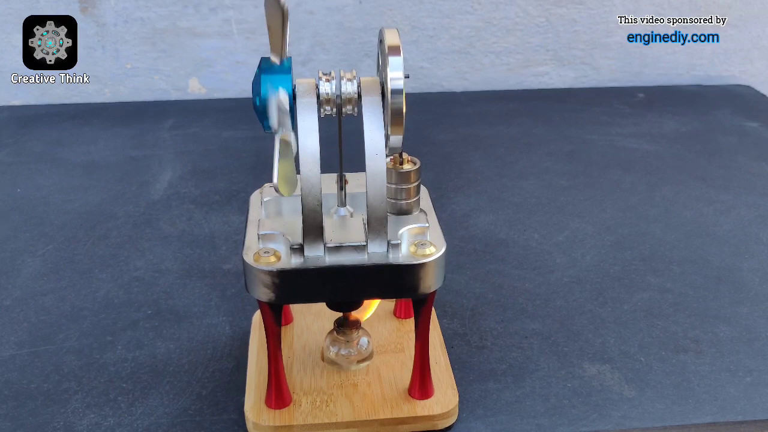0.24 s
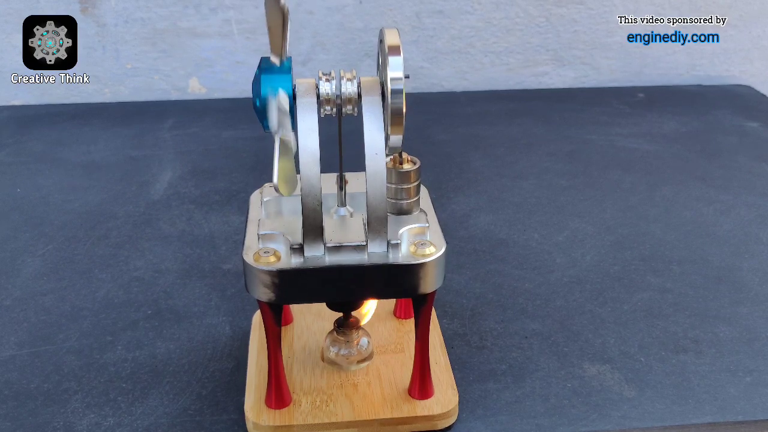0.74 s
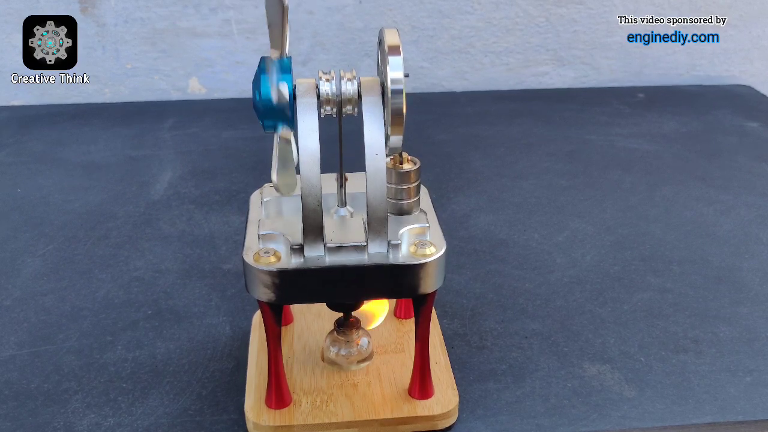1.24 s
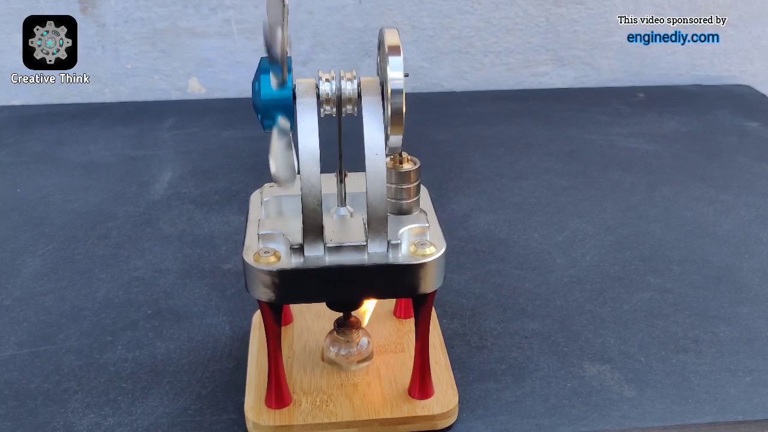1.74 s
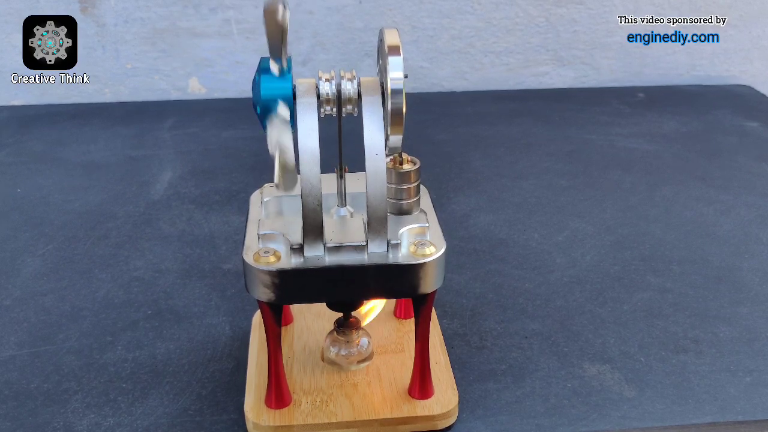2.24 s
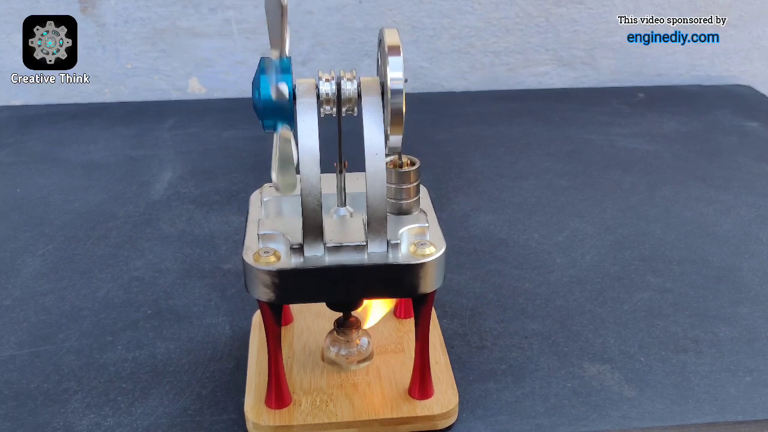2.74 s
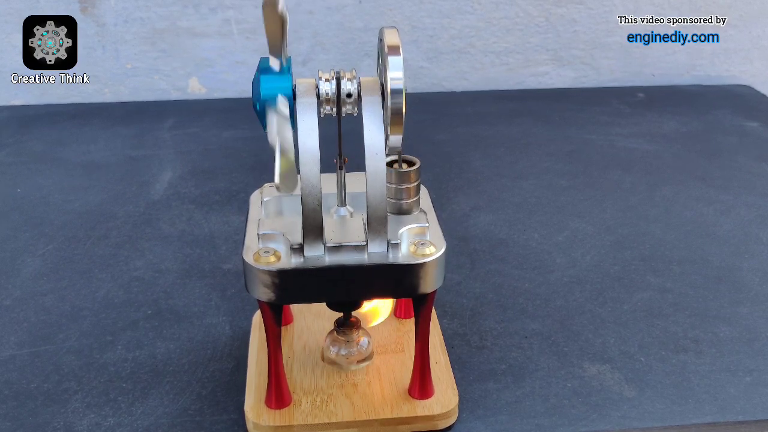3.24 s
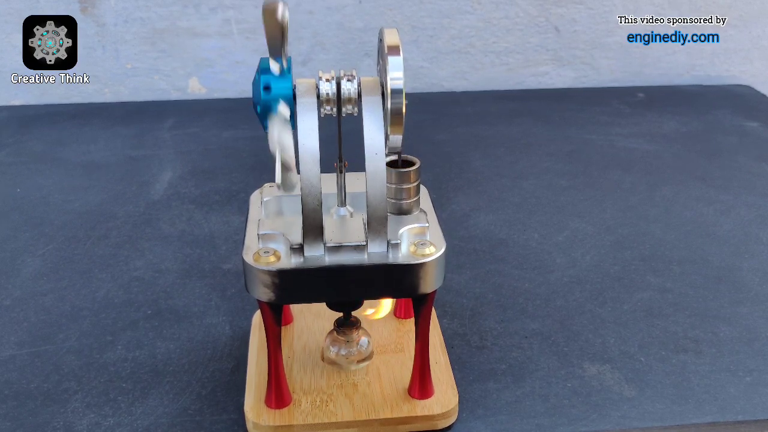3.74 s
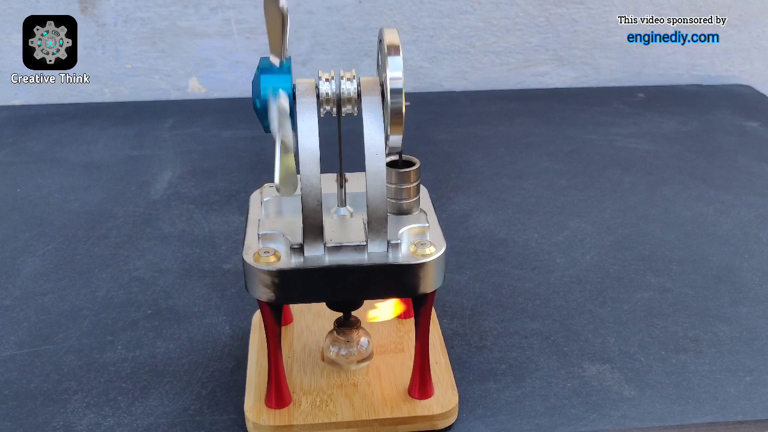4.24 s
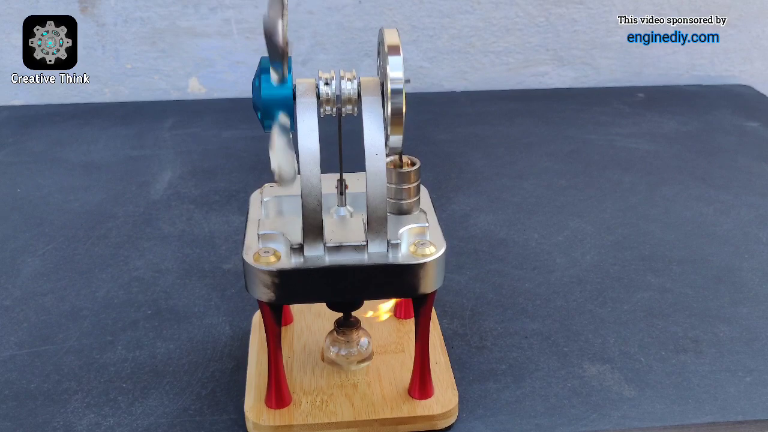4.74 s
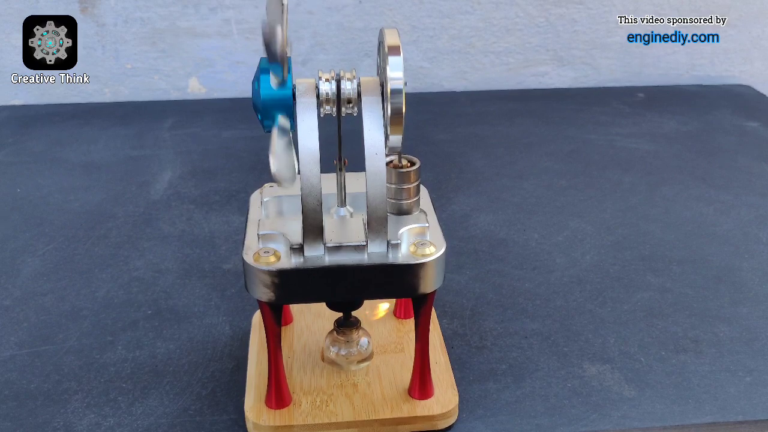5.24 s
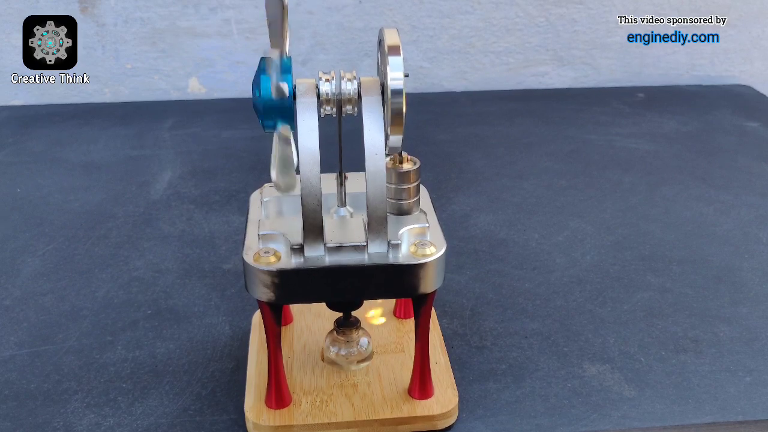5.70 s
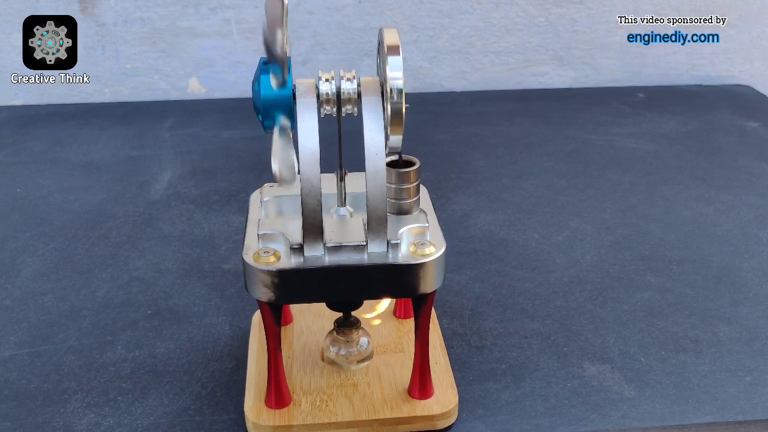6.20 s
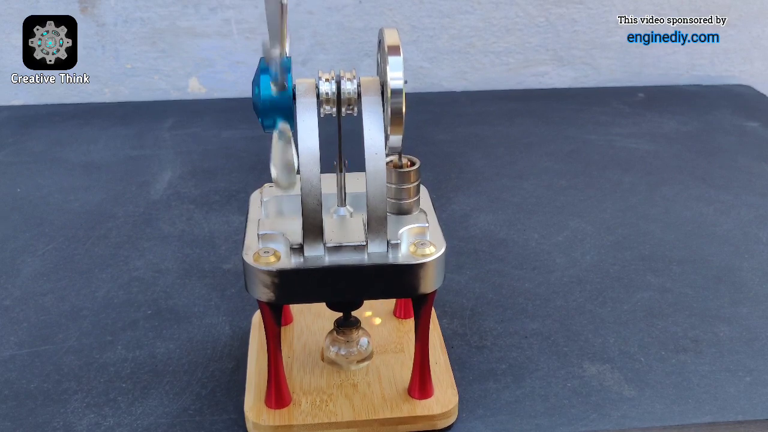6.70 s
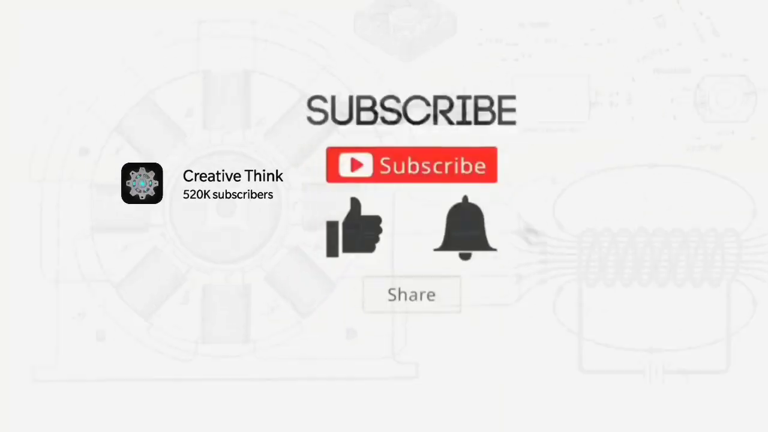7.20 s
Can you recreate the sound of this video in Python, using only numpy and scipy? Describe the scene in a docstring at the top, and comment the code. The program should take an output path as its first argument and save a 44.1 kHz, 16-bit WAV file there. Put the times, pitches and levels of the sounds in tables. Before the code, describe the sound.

From 0 s a small metal hot-air engine is already running close to a stereo phone microphone. It makes a rapid, bright, dry clatter, about twelve turns a second, each with a hard main knock and a nearly equal return knock, plus weaker rebounds and scratchy piston rubbing. The clicks are short, crisp and concentrated in the treble, varying a little in strength. Beneath are a faint hollow airy tone near 930 Hz, fading slowly, a soft low hum and quiet hiss. The pace eases slightly, more noticeably after 4 s, to about eleven turns a second. Wind is barely present at first; small low puffs come from about 3.4 s, mostly left, growing into fluttering thumps from 5.4 s and strongest from 6 to 6.9 s. At about 6.92 s everything cuts off instantly, without a tail, and silence remains until the end.

```python
"""A small metal hot-air engine runs on a table, slowing as it goes: five knocks a turn ring its frame.
Blows and the rubbing piston excite damped modes; the cylinder is noise through a narrow resonance.
The base hums in harmonics of the turning rate. Shaped noise makes the hiss and the wind on the ports
of a two-port phone microphone, which rises towards the end; then all is cut off."""
import sys
import numpy as np
from scipy import signal
from scipy.fft import rfft, irfft, next_fast_len
from scipy.io import wavfile
from scipy.ndimage import uniform_filter1d

SR = 44100
rng = np.random.default_rng(int(sys.argv[2]) if len(sys.argv) > 2 else 0)


def invert_db(level):
    """Linear amplitude ratio for a level in decibels (20 dB per decade), elementwise."""
    return 10 ** (np.asarray(level, dtype=float) / 20)


def transcribe(signal):
    """Save signal, clipped to [-1, 1], as a 16-bit WAV file at the path in sys.argv[1]."""
    frames = np.atleast_2d(signal).T
    limited = np.clip(frames, -1, 1)
    pcm = np.round(limited * 32767).astype(np.int16)
    wavfile.write(sys.argv[1], SR, pcm)


N = 328972


def shape(x, points):
    """Linear filtering: a zero-phase gain through (f/Hz, gain/dB) points on a log frequency axis."""
    hz, db = np.transpose(points)
    size = next_fast_len(N)
    log_hz = np.log(np.arange(size // 2 + 1) * SR / size + 1)
    gain = invert_db(np.interp(log_hz, np.log(hz), db))
    return irfft(rfft(x, size) * gain, size)[..., :N]


def colour(x, points):
    """Spectral shaping with normalised power: the filtered signal has rms 1."""
    y = shape(x, points)
    return y / np.sqrt(np.mean(y ** 2))


def walk(rate):
    """Random modulation: normal values held for 1 / rate s, then smoothed twice; spread near 1."""
    k = int(SR / rate)
    held = np.repeat(rng.standard_normal(N // k + 1), k)
    return 0.81 * uniform_filter1d(uniform_filter1d(held, k), k)[:N]


def ring(x, hz, t60):
    """Damped resonance: one complex pole; a unit impulse rings with size 1."""
    pole = np.exp(2j * np.pi * hz / SR - np.log(1000) / (t60 * SR))
    return signal.lfilter([1], [1, -pole], x).imag


# colour of the quiet air and microphone hiss: f/Hz, relative level left/dB, right/dB
AIR = [(29.85, -36.5, -32.5), (124.5, 1, -1), (303, -12.5, -8.5), (667, -11, -20), (1510, -17, -18),
       (3200, -16.5, -34.5), (6400, -9.5, -9), (8600, -49.5, -32.5), (11200, -43, -30), (12500, -44, -32),
       (14120, -30, -34), (15300, -43, -33)]
# thin wavering tones: f/Hz, relative level/dB
WHINE = [(13744, -75), (14077, -83), (14153, -69)]


def air():
    """Partly coherent noise: hiss most alike at both ports in the bass, with tones that come and go."""
    hiss_db = -45  # rms
    mid, side = rng.standard_normal((2, N))
    side = side - .7 * uniform_filter1d(side, size=12)  # less difference in the bass
    table = np.array(AIR)
    left = shape(mid + side, table[:, [0, 1]])
    right = shape(mid - side, table[:, [0, 2]])
    hiss = np.array([left, right])
    t = np.arange(N) / SR
    wobble_rad = 3.0
    tones = np.zeros(N)
    for hz, db in WHINE:
        tones += invert_db(db + 4.0 * walk(7)) * np.sin(2 * np.pi * hz * t + wobble_rad * walk(25))
    return hiss / hiss.std() * invert_db(hiss_db) + tones * invert_db(np.array([[-4.0], [3.5]]))


# steady wind: t/s, relative level/dB
WIND = [(0, -54), (1.3, -55), (2.2, -51), (3.1, -47), (3.5, -40.5), (4.5, -44.5), (5.3, -40), (5.9, -34.5),
        (6.1, -38.5), (6.4, -32), (6.92, -30)]
# colour of the wind: f/Hz, relative level/dB
WIND_COLOUR = [(12, -7), (30, -2.5), (60, -7), (110, -20), (200, -26), (400, -47), (800, -75.5)]
# gusts, mostly on the left port: t/s, relative peak level/dB, length between 1/e points of power/s
GUSTS = [(1.412, -49, .04), (2.324, -50, .06), (3.399, -38.5, .06), (3.771, -36, 0.099),
         (3.893, -31, 0.025), (4.166, -39.5, .08), (4.245, -35, .04), (4.332, -33, 0.037),
         (4.655, -36.5, 0.084), (4.832, -40, 0.059), (4.938, -30.5, 0.033), (5.447, -27, 0.053),
         (5.55, -31, 0.063), (5.648, -25, 0.045), (5.743, -30.5, 0.041), (5.806, -27.5, 0.022),
         (5.954, -28.5, 0.039), (6.022, -17, 0.023), (6.125, -22, 0.11), (6.225, -26, 0.054),
         (6.312, -21, 0.043), (6.48, -33, 0.025), (6.662, -26, 0.059), (6.764, -20.5, 0.024),
         (6.838, -22.5, 0.029)]
# sharp buffets, strongest on the left port and peaking 4 ms after t: t/s, relative peak level/dB
BUFFETS = [(5.436, -36), (5.639, -42.5), (5.988, -30.5), (6.019, -28.5), (6.072, -26.5), (6.109, -33),
           (6.168, -37), (6.209, -32.5), (6.31, -29), (6.631, -22), (6.759, -31.5), (6.829, -34.5),
           (6.897, -29)]
# colour of the buffets: f/Hz, relative level/dB
BUFFET_COLOUR = [(40, -9), (120, 9), (250, -5), (500, -18), (900, -47.5)]


def port_power(left_minus_right_db):
    """Power division: shares at left and right that always add up to 4."""
    return 4 / (1 + invert_db(2 * left_minus_right_db * np.array([[-1], [1]])))


def wind():
    """Turbulent pressure noise: separate eddies at each port, swelling in gusts, and shared buffets."""
    steady_pan_db, gust_pan_db = 3.5, 17.5  # left minus right
    t = np.arange(N) / SR
    # amp of twice the dB is a power
    steady = invert_db(2 * np.interp(t, *np.transpose(WIND)))
    gusts = sum(invert_db(2 * db) * np.exp(-((t - at) / length * 2) ** 2) for at, db, length in GUSTS)
    size = np.sqrt(steady * port_power(steady_pan_db) + gusts * port_power(gust_pan_db))
    eddies = rng.standard_normal((2, N)) * invert_db(3.8 * np.array([walk(40), walk(40)]))
    gate = sum(invert_db(db) * np.exp(-((t - at - .004) / 0.008) ** 2) for at, db in BUFFETS)
    buffets = gate * colour(rng.standard_normal(N), BUFFET_COLOUR)
    return colour(eddies, WIND_COLOUR) * size + buffets * invert_db(np.array([[3.0], [-14.0]]))


# the slowing crank, every fifth main knock: t/s, how hard the joints knock/dB
CRANK = [(0.0111, 0), (.426, -1), (0.8416, 0), (1.2606, 0.5), (1.6805, 0.5), (2.1006, 0.5), (2.521, 1),
         (2.9435, -0.5), (3.3676, 0.5), (3.7946, -1), (4.2243, 0), (4.658, 0), (5.0952, -0.5), (5.5377, 0),
         (5.9878, -1), (6.448, -2.5), (6.9152, -2)]


def turns():
    """Kinematics: time of each turn's main knock, and how hard that turn runs in dB."""
    turns_a_row = 5
    s, db = np.transpose(CRANK)
    row = np.arange((len(s) - 1) * turns_a_row + 1) / turns_a_row
    return np.interp(row, np.arange(len(s)), s), np.interp(row, np.arange(len(s)), db)


def crank():
    """Rotational phase: share of a turn since the last main knock, at every sample."""
    s = turns()[0]
    # one turn more at each end, then a far point
    s = np.r_[2 * s[0] - s[1], s, 2 * s[-1] - s[-2], 9]
    return np.interp(np.arange(N) / SR, s, np.arange(len(s))) % 1


# base humming on the table: multiple of the turning rate, relative level at the start/dB, once slowed/dB
HUM = [(7, -58, -58), (9, -60, -66), (13, -56, -61), (14, -54, -68), (15, -51, -46), (16, -56, -55),
       (17, -53, -59), (18, -61, -50), (21, -66, -64)]


def base(turn):
    """Forced vibration: the unbalanced crank shakes the base at harmonics whose balance shifts."""
    hum_db, waver_db, slowed_s = -0.8, 2.2, 6.1
    slowed = np.clip(np.arange(N) / SR / slowed_s, 0, 1)
    hum = np.zeros(N)
    for k, fast_db, slow_db in HUM:
        level_db = fast_db + (slow_db - fast_db) * slowed + waver_db * walk(9)
        hum += invert_db(level_db) * np.sin(2 * np.pi * (k * turn + rng.random()))
    # same phase at both ports, a little louder at the left
    return np.sqrt(2) * invert_db(hum_db) * hum * invert_db(0) * np.array([[invert_db(invert_db(0) * 1.2)], [invert_db(-1.2)]])


# air singing in the cylinder over a turn: share of turn, relative level/dB
SING = [(0, -53.5), (.12, -51.5), (.42, -52), (.55, -59.5), (.7, -56.5), (.85, -51.5), (1, -53.5)]
# slow change added to it: t/s, gain/dB
SING_FADE = [(0, 6), (1.999, 4), (4, 2), (6.901, -0.5)]


def cylinder(turn):
    """Acoustic resonance: air shuttled by the displacer blows a narrow resonance of two equal stages."""
    sing_hz, stage_width_hz = 935, 25.8
    t60 = np.log(1000) / np.pi / stage_width_hz
    tone = ring(ring(rng.standard_normal(N), sing_hz, t60), sing_hz, t60)
    db = np.interp(turn, *np.transpose(SING))
    db = db + np.interp(np.arange(N) / SR, *np.transpose(SING_FADE))
    return tone / tone.std() * invert_db(db)


# usual knocks, one row each for main, rebound, return, rod: relative level/dB, scatter between turns/dB
USUAL = [(-10.8, 1.2), (-30.5, 2.5), (-12.2, 1.2), (-31, 3.5)]
# turns that stand out, hard or soft: t/s, relative level of main knock/dB, of return knock/dB
ODD_TURNS = [(.177, -14.5, -12), (.26, -10.5, -19.5), (.509, -10.5, -16.5), (.593, -10, -13.5),
             (.675, -8.5, -12), (.841, -16, -12.5), (1.094, -16, -15), (1.177, -10.5, -16),
             (1.261, -24.5, -15.5), (1.763, -11, -10.5), (2.016, -11.5, -19), (2.773, -8.5, -14),
             (3.028, -15, -9.5), (3.113, -14.5, -12.5), (3.452, -12.5, -10), (3.538, -12.5, -13.5),
             (4.138, -10, -17.5), (4.225, -8.5, -11.5), (4.832, -9, -12.5), (5.183, -11.5, -10),
             (5.271, -9.5, -14.5), (5.807, -12, -10)]
# the return knock comes later as the crank slows: t/s, share of a turn after the main knock
RETURN_TURN = [(0, 0.38), (5, .399), (6.9, .414)]


def knocks():
    """Impact timing: times and sizes of tick, main, rebound, return and rod knock, shape (kind, turn)."""
    tick_db, tick_lead_s = -28, .003
    rebound_turn, rod_turn = .152, .642  # shares of a turn after the main knock
    slack_s = .0005  # the play in the joints shifts each main knock
    s, hard_db = turns()
    turn_s = np.gradient(s)
    chance = rng.standard_normal((5, len(s)))
    levels = [db + hard_db + scatter_db * c for (db, scatter_db), c in zip(USUAL, chance)]
    main_db, rebound_db, return_db, rod_db = levels
    for at, odd_main_db, odd_return_db in ODD_TURNS:
        k = np.argmin(np.abs(s - at))
        main_db[k], return_db[k] = odd_main_db, odd_return_db
    return_turn = np.interp(s, *np.transpose(RETURN_TURN))
    when = [s - tick_lead_s, s + slack_s * chance[4], s + rebound_turn * turn_s,
            s + return_turn * turn_s, s + rod_turn * turn_s]
    ticks_db = np.full(len(s), tick_db)
    return np.array(when), invert_db(np.array([ticks_db, main_db, rebound_db, return_db, rod_db]))


def contact(build_ms, dying_ms, count):
    """Contact force: a loose joint jostles in many uneven touches, much alike from turn to turn."""
    repeat = 0.68  # share of the jostling that is the same on every turn
    ms = np.arange(800) * 1000 / SR
    swell = (1 - np.exp(-ms / build_ms)) ** 2 * np.exp(-ms / dying_ms)
    touches = rng.standard_normal((count + 1, 800)) * invert_db(4.4 * rng.standard_normal((count + 1, 800)))
    return swell * (np.sqrt(repeat) * touches[0] + np.sqrt(1 - repeat) * touches[1:])


# modes of the frame: f/Hz, t60/s, left minus right/dB, then relative level/dB when excited by
# tick, main, rebound, return, rod knock and rubbing
FRAME = [(959.5, 0.14, -1.5, -24.5, -41.5, -33, -40, -32, -18),
         (1002, 0.095, 4.5, -20, -35, -26, -46, -23, -19),
         (1315, 0.035, 3.5, -9, -47, -21, -41, -19, -23.5), (1854, 0.028, 1, -3, -48, -12, -51, -9, -14),
         (2273, 0.015, 8, 0, -19.5, -21, -26, -17.5, -17),
         (2443, 0.019, -0.5, -8, -19, -6.5, -20, -4.5, -7),
         (2811, 0.02, 2, -27.5, -30, -12.5, -27.5, -14, -5),
         (3630, 0.045, -7.5, -13, -55.5, -10, -55.5, -8.5, -43),
         (3978, 0.026, -5, 0, -27.5, -10, -24.5, -9, -6),
         (4198, 0.017, 1.5, 0.5, -16.5, 5.5, -11.5, 8, 2.5),
         (4873, 0.055, -5, -3, -28.5, -12, -19.5, -16, -14),
         (4917, 0.016, 12.5, 2.5, -15.5, -18, -30.5, -10, -9),
         (5570, 0.032, 5.5, -7.5, -9.5, 9.5, -16.5, -12, -11),
         (5757, 0.023, 11.5, -2.5, 1, -5, -1, 4, -0.5),
         (6190, 0.027, 5.5, -16.5, -23, -10.5, -12, -11, -13), (6170, 0.011, 21, -10, -2, -10, -2, -6, 6.5),
         (6430, 0.0077, 20, -2.5, -20.5, -29.5, -5.5, 7.5, -4),
         (7290, 0.0069, -45.5, -13, -35, -18.5, -27.5, -19.5, -19),
         (6930, .025, -5, -21, -23.5, -17, -29, -21, -24),
         (7590, .02, -28, -26.5, -36, -27.5, -35, -25.5, -30.5),
         (8080, 0.021, -16.5, -12.5, -36, -12.5, -23.5, -16.5, -32.5),
         (8724, 0.0097, -27.5, -11.5, -36, -3, -33.5, -12.5, -24.5),
         (9040, 0.0059, -30.5, -21, -35, -10.5, -30.5, -8, -31.5),
         (13000, .012, -2.5, -30.5, -36.5, -24.5, -47, -26.5, -37),
         (14200, .012, -23, -27, -38, -19, -34.5, -19.5, -28),
         (15370, .012, -8.5, -25, -42.5, -22, -37, -30.5, -28.5)]


def modes(size):
    """Modal response: spectra of the modes; each takes a band of the force, so it builds up softly."""
    spot_width_hz, dry_db, dry_shorter = 595, -1.5, 16.7
    hz, t60 = np.array(FRAME)[:, :2].T[..., None]
    off = 2j * np.pi * (np.arange(size // 2 + 1) * SR / size - hz)
    damping = np.log(1000) / t60
    # the many heavily damped neighbours of each mode give the dry crack
    both = 1 / (off + damping) + invert_db(dry_db) / (off + dry_shorter * damping)
    return SR / 2 * both / (1 + off / (2 * np.pi * spot_width_hz)) ** 2


# piston rubbing over a turn: share of turn, relative level/dB
RUB = [(0, -39.5), (.1, -48), (.25, -44), (.36, -80), (.45, -58), (.58, -42), (.68, -52), (.8, -50.5),
       (1, -57)]


def rubbing(turn, table, ports, body):
    """Friction excitation: uneven noise of the rubbing piston, convolved with the frame response."""
    rub_db = np.interp(turn, *np.transpose(RUB)) + 5.7 * walk(150)
    rub = invert_db(rub_db) * rng.standard_normal(N) / 10
    impulse = irfft((invert_db(table[:, 8]) * ports) @ body)
    return signal.fftconvolve(rub[None], impulse, axes=1)[:, :N]


# contact of each knock, rows tick, main, rebound, return, rod: build-up/ms, dying/ms, gain/dB
CONTACT = [(0.45, 1.31, -4.5), (0.88, 1.6, -3), (0.084, 2.6, -3.5), (0.46, 1.3, -3.5), (0.72, 4.5, -4.5)]


def knocking(table, ports, body):
    """Impact excitation: every kind of knock drives the same modes from its own spot."""
    scatter_db = 2.0  # of each mode from blow to blow
    even = .58  # how far the touches share out their force evenly over the spectrum
    lead = 256  # samples kept for the faint run-up of each blow
    out = np.zeros((2, N + 8192))
    when, size = knocks()
    for s, strength, spot_db, (build, dying, db) in zip(when, size, table[:, 3:8].T, CONTACT):
        share = invert_db(spot_db + scatter_db * rng.standard_normal((len(s), 2, len(table))))
        force = rfft(contact(build, dying, count=len(s)), 8192)
        force /= uniform_filter1d(np.abs(force), size=30) ** even
        blow = (force[:, None] * ((share * ports) @ body)).transpose(1, 0, 2)
        # the colour is left to chance, the energy follows the strength of the blow
        usual = np.sum(np.abs((invert_db(spot_db) * ports) @ body) ** 2)
        energy = np.sum(np.abs(blow) ** 2, axis=(0, 2))
        blow *= (strength * invert_db(db) * np.sqrt(usual / energy))[:, None]
        sounds = np.roll(irfft(blow), lead, axis=2).transpose(1, 0, 2)
        for at, sound in zip((s * SR).astype(int) - lead, sounds):
            out[:, at:at + 8192] += sound
    return out[:, :N]


def frame(turn):
    """Modal superposition: knocks and rubbing ring one set of modes, heard with a delay between ports."""
    port_lead = 3  # samples by which the sound reaches the left port earlier
    table = np.array(FRAME)
    ports = invert_db(np.outer([.5, -.5], table[:, 2]))
    body = modes(8192)
    left, right = knocking(table, ports, body) + rubbing(turn, table, ports, body)
    return np.array([np.roll(left, -port_lead), right])


def scene():
    """Superposition: engine with a short diffuse scatter off table and wall, wind and air."""
    turn = crank()
    clatter = frame(turn)
    t = np.arange(4000) / SR
    t60 = 0.074  # s
    tail = rng.standard_normal((2, 4000)) * invert_db(-60 * t / t60) * (t > .002)
    echo = signal.fftconvolve(clatter, tail, axes=1)[:, :N]
    return clatter + invert_db(-36.0) * echo + cylinder(turn) + base(turn) + wind() + air()


# response of the microphone, with a deep notch in the treble: f/Hz, gain/dB
MICROPHONE = [(20, 2), (9000, 0), (10000, 0), (11200, -13.5), (12300, -3), (13000, -0.5), (15500, 4),
              (16300, -20.5)]


def microphone(x):
    """Transducer response: a fixed gain over frequency, the same for both ports."""
    return shape(x, MICROPHONE)


def band_limit(x):
    """A steep low-pass at the top of the band."""
    return signal.sosfilt(signal.butter(12, 16790, fs=SR, output="sos"), x)


def record(dry):
    """Gating: the microphone signal falls to silence in a linear ramp of 1.7 ms."""
    cut_s, ramp_s = 6.922, 0.0017
    fade = np.clip((cut_s - np.arange(N) / SR) / ramp_s, 0, 1)
    return band_limit(microphone(dry) * fade)


dry = scene()
out = record(dry)
transcribe(out)
```